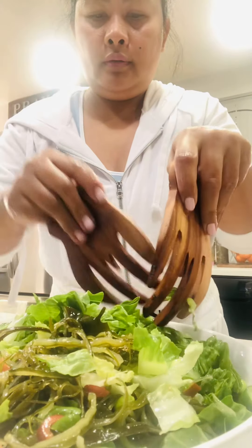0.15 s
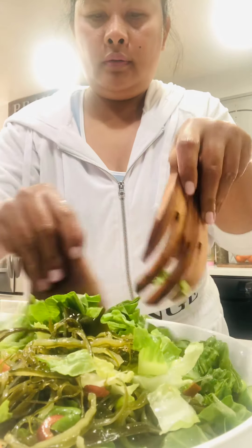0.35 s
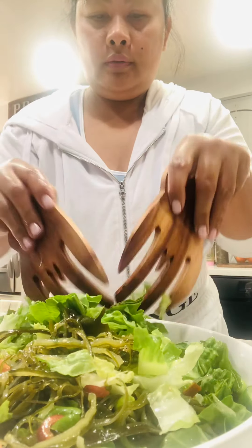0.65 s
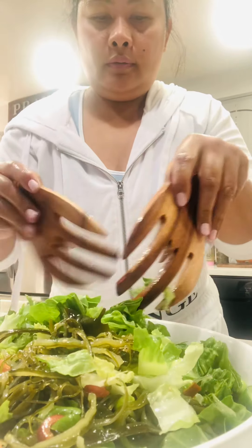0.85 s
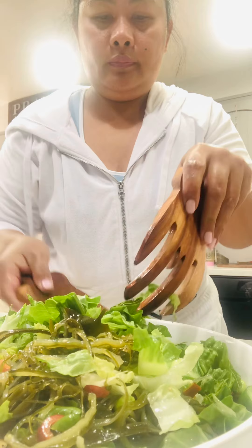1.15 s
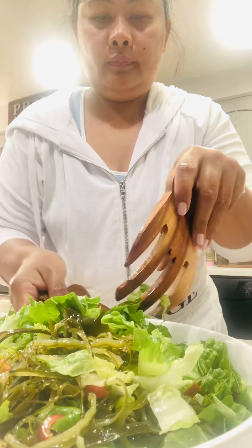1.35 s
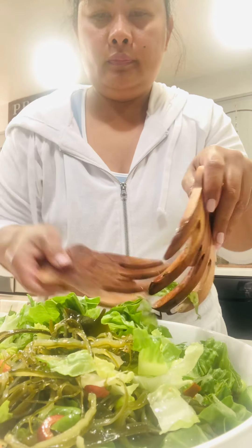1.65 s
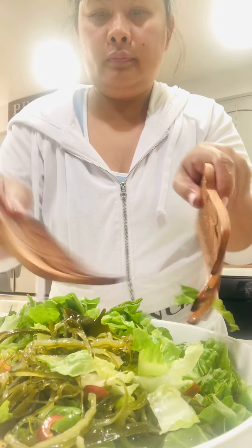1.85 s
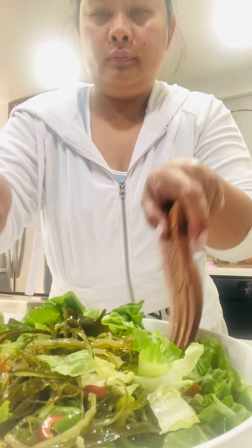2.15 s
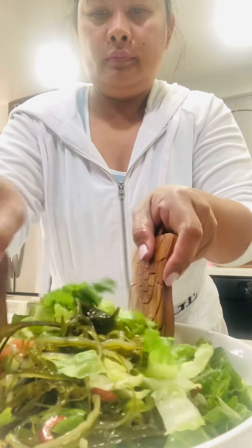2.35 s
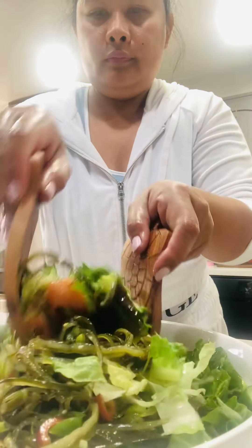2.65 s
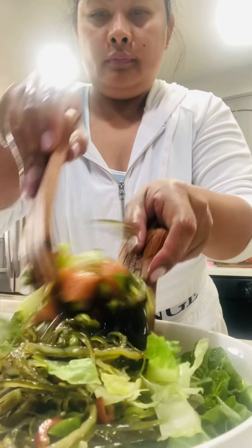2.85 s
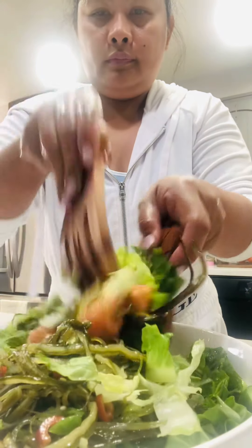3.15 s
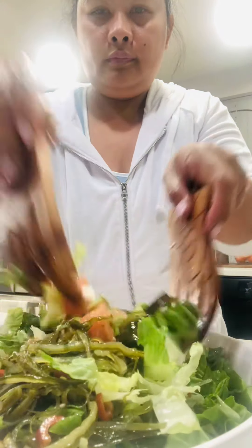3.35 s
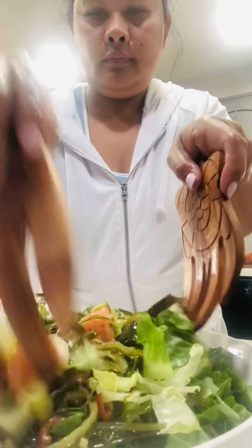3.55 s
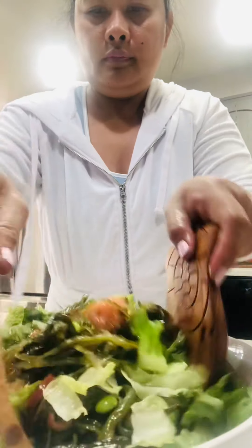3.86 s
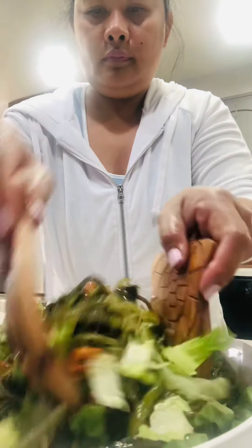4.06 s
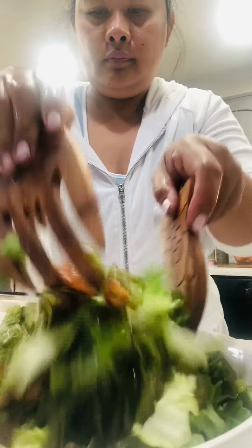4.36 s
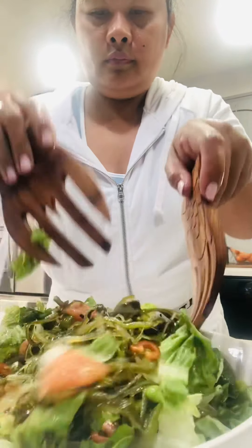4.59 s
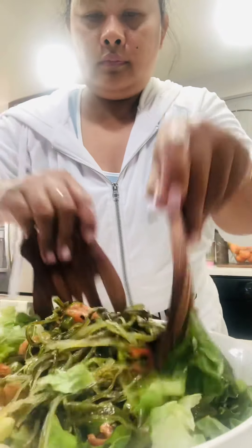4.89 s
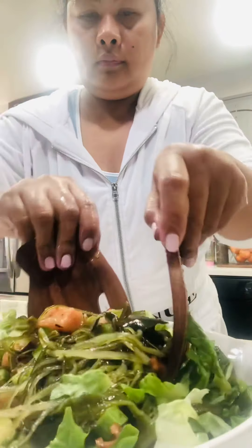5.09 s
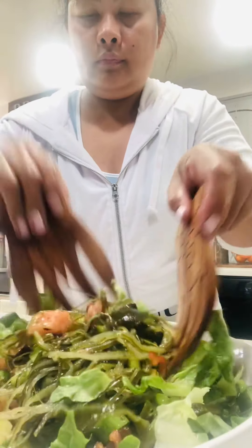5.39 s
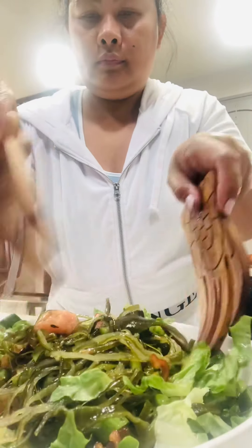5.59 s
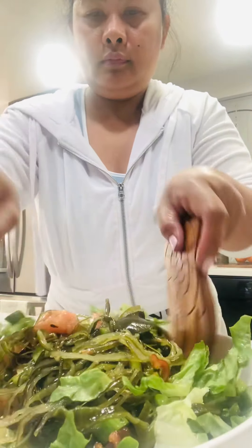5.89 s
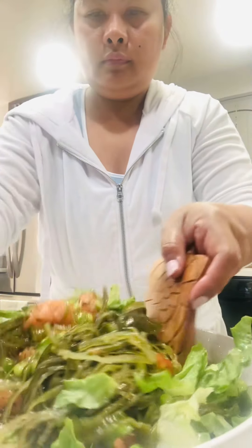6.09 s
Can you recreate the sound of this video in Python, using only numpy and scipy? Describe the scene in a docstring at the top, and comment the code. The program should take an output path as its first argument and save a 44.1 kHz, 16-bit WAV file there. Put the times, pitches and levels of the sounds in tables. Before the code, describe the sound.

Wet lettuce and seaweed are turned with wooden servers in a ceramic bowl, heard close and fairly dry with slight room echo. Gentle rustling is broken by a light tap, a bright dragging clank, and a quick double knock with a swishing heap. Crisp snaps peak midway, quiet pauses and softer leaf folds follow, and three woody, ringing knocks end the stirring. Low fridge hum and soft air stay beneath.

```python
"""Wooden salad servers toss wet leaves and seaweed in a big ceramic bowl in a quiet kitchen, a fridge humming.
A light knock at 0.2 s opens the stirring; a harder one at 1.3 s drags on and makes the bowl sing in its rim modes.
A double knock near 2.06 s starts a toss full of leaf snaps; the sharpest snaps come at 3.7 s, softer ones near 5 s.
Three knocks from 5.6 to 5.9 s close it. Blows are decaying modes, rubs and faint whistles are resonant noise,
leaves are ringing grains and hiss, snaps are short noise bursts, the room is feedback delays."""
import sys
import numpy as np
from scipy import signal
from scipy.fft import rfft, irfft, next_fast_len
from scipy.io import wavfile

SR = 44100
rng = np.random.default_rng(int(sys.argv[2]) if len(sys.argv) > 2 else 0)


def log_audio(samples):
    """Write samples as a 16-bit WAV file to the path given in sys.argv[1]."""
    # one column per channel
    frames = np.atleast_2d(samples).T
    # limit to full scale, then quantise
    limited = np.clip(frames, -1, 1)
    pcm = np.round(limited * 32767).astype(np.int16)
    wavfile.write(sys.argv[1], SR, pcm)


N = 274787

# rim modes of the bowl: mode_hz, t60_s
BOWL_MODES = [(405, 0.2), (983, 0.64), (1708, 0.32), (2541, 0.041), (3478, 0.085), (4500, .09),
              (5620, 0.057), (6830, 0.091), (8145, 0.072), (9520, 0.068), (10980, 0.03)]
# blows of the servers on the bowl: start_s, contact_s,
# damping by server and leaves: low_damping_db_per_s (three lowest modes), high_damping_db_per_s (the others),
# clack_db, clack_t60_s, crack_hz, crack_db, clatter_db, thud_db, jolt_db (of the heap),
# mode_db x 7 (lowest bowl modes, set by the place of the blow), higher_modes_db
KNOCKS = [(0.215, 0.0008, 79, 50, -38.5, 0.019, 4450, -18, -48, -41, -52.5, -41, -47, -34.5, -13.5, -30.5, -32, -48, -41.5),
          (1.3025, 0.00037, 430, 57, -19, 0.034, 6200, -24.5, -41.5, -50, -47, -28.5, -19, -24, -12.5, -17, -33.5, -28.5, -36),
          (2.0566, 0.0012, 250, 200, -40, 0.023, 3000, -52, -43, -47, -60, -59, -50, -32, -34, -50, -52, -59, -61),
          (2.063, 0.0002, 500, 89, -25.5, 0.032, 5500, -42, -30.5, -26.5, -40.5, -29, -33.5, -27.5, -17, -31.5, -35, -35, -41),
          (5.6095, 0.00081, 370, 20, -27, 0.02, 3000, -40.5, -51.5, -31.5, -44.5, -27.5, -28.5, -36.5, -27.5, -32, -38.5, -45, -54.5),
          (5.737, 0.00034, 29, 10, -32.5, 0.042, 6000, -34.5, -27, -31.5, -49, -27, -31, -18, -5, -25, -18, -27, -43.5),
          (5.8985, 0.00049, 3.9, 56, -26, 0.016, 1620, -26, -47, -41, -76, -62, -80, -68, -65, -65, -65, -58, -66)]
# stirring: time_s, rustle_db, shove_db (servers pushing through)
STIR = [(0, -84, -80.5), (0.2, -92, -68), (0.25, -62.5, -59), (0.32, -58, -63), (0.38, -73, -71),
        (0.55, -67.5, -71), (0.7, -88.5, -74.5), (1.0, -80, -70.5), (1.29, -75.5, -67.5),
        (1.34, -62, -45.5), (1.42, -68, -58), (1.58, -62, -82), (1.64, -79.5, -72), (1.85, -89, -88.5),
        (2.0, -69, -68.5), (2.1, -62, -55), (2.15, -50, -55.5), (2.25, -55, -54.5), (2.3, -61, -52),
        (2.42, -70, -63.5), (2.55, -67, -72.5), (2.7, -71.5, -75), (2.87, -66, -70), (2.92, -84, -81),
        (3.03, -69.5, -69), (3.07, -61.5, -65.5), (3.2, -62, -67), (3.3, -75, -77), (3.4, -69.5, -79.5),
        (3.52, -81, -70.5), (3.62, -58, -63), (3.82, -56, -59), (3.92, -59, -59), (3.98, -69, -72),
        (4.4, -70, -75), (4.47, -79.5, -79), (4.76, -77.5, -82), (4.82, -56, -60), (4.88, -62.5, -61),
        (5.04, -59, -60.5), (5.1, -68.5, -68), (5.2, -65, -68), (5.27, -67, -72), (5.32, -61.5, -64.5),
        (5.45, -77.5, -85.5), (5.6, -90, -71), (5.7, -66, -59), (5.78, -54, -60), (5.93, -57, -60),
        (6.08, -61, -53), (6.19, -72, -68), (6.23, -63.5, -77.5)]


def from_db(db):
    """Decibels to gain."""
    return 10 ** (np.asarray(db) / 20)


def rms_one(x):
    """Scale to rms 1."""
    return x / np.sqrt(np.mean(x ** 2) + 1e-20)


def peak_one(x):
    """Scale to peak 1."""
    return x / np.abs(x).max()


def add(out, start_s, sound):
    """Mix a sound in at start_s."""
    at = round(start_s * SR)
    out[at:at + len(sound)] += sound[:N - at]


def along(table, time_s):
    """Columns of a table, interpolated at time_s."""
    times_s, *columns = np.transpose(table)
    return [np.interp(time_s, times_s, c) for c in columns]


def drift(rate_hz):
    """Slow random wander of spread 1: noise through two equal poles, run at SR / 40."""
    r = np.exp(-80 * np.pi * rate_hz / SR)
    noise = rng.standard_normal(N // 40 + 2002)
    slow = signal.lfilter([1], [1, -2 * r, r * r], noise)[2000:]   # settled part
    return np.interp(np.arange(N) / 40, np.arange(len(slow)), rms_one(slow))


def burst(t, t60_s):
    """Noise that dies exponentially."""
    return rng.standard_normal(len(t)) * from_db(-60 * t / t60_s)


def ring(x, hz, t60_s):
    """Two-pole resonator: a unit click sets a decaying sine of height 1 ringing."""
    r = from_db(-60 / (t60_s * SR))
    w = 2 * np.pi * hz / SR
    return signal.lfilter([0, np.sin(w)], [1, -2 * r * np.cos(w), r * r], x + 1e-18)


def struck(hz, db, t60_s, t, contact_s):
    """A mode that swells while the contact lasts, the low ones later, then dies."""
    swell = (1 - np.exp(-t / (contact_s + 0.61 / hz))) ** 2
    return from_db(db - 60 * t / t60_s) * swell * np.sin(2 * np.pi * hz * t)


def colour(x, spectrum):
    """Filter x by a spectrum interpolated on a log-frequency axis; rms 1."""
    size = next_fast_len(N)
    hz = np.maximum(np.arange(size // 2 + 1) * SR / size, 1)
    points = np.array(spectrum)
    gain_db = np.interp(np.log(hz), np.log(points[:, 0]), points[:, 1])
    return rms_one(irfft(rfft(x, size) * from_db(gain_db), size)[:N])


def fridge():
    """Mains hum and motor tones whose level and phase waver."""
    # tone_hz, rms_db (before wavering), waver_db
    hum_tones = [(59.8, -69, 0), (116.4, -78.5, 4.5), (282, -78, 2.5), (363, -74.5, -0.5)]
    t = np.arange(N) / SR
    out = np.zeros(N)
    for hz, db, waver_db in hum_tones:
        level = np.sqrt(2) * from_db(db + waver_db * drift(3.5))
        out += level * np.sin(2 * np.pi * hz * t + waver_db * 0.18 * drift(3.7))
    return out


def kitchen_air():
    """Steady background noise, coloured by its spectrum."""
    # point_hz, relative_db
    air_spectrum = [(25, -33.5), (45, -13), (70, -10.5), (150, 0), (220, -5), (290, 1), (400, -7),
                    (900, -13), (1700, -18.5), (2400, -20.5), (6200, -22.5), (8500, -28), (12000, -32),
                    (15600, -32.5), (16100, -68)]
    air_rms_db = -65.5
    return from_db(air_rms_db) * colour(rng.standard_normal(N), air_spectrum)


def grains(per_s, spread_db, clump_db):
    """Tiny clicks of uneven size that come in clumps."""
    sizes = from_db(spread_db * np.minimum(rng.exponential(1, N), 4)) * rng.standard_normal(N)
    odds = per_s * from_db(clump_db * drift(25)) / SR
    return sizes * (rng.random(N) < odds)


def leaves(spectrum, per_s, low_hz, high_hz, cycles, smooth):
    """Wet grains ring folds of 12 sizes, over the smooth hiss of leaf sliding on leaf; smooth = hiss share."""
    clicks = grains(per_s, spread_db=2.5, clump_db=4.0)
    dealt = rng.integers(0, 12, N)
    rung = np.zeros(N)
    for k, hz in enumerate(np.geomspace(low_hz, high_hz, 12)):
        rung += ring(clicks * (dealt == k), hz, cycles / hz) * np.sqrt(hz)
    hiss = rng.standard_normal(N) * from_db(5.2 * drift(6.7))
    return colour(np.sqrt(1 - smooth) * rms_one(rung) + np.sqrt(smooth) * hiss, spectrum)


def shove():
    """Servers push through the heap: mostly smooth, low leaf noise; rms 1."""
    # point_hz, relative_db
    shove_spectrum = [(350, -33.5), (600, -19.5), (777, -17), (984, -1), (2910, -7.5), (3500, -4.5),
                      (4550, -24.5), (7700, -120)]
    return leaves(shove_spectrum, 700, 773, 3000, cycles=22.0, smooth=0.88)


def rustle():
    """Leaves rub and fold: grainier, brighter leaf noise; rms 1."""
    # point_hz, relative_db
    rustle_spectrum = [(1180, -33.5), (2000, -6.5), (2810, -4.5), (4260, -3.5), (4890, -2), (7310, -7.5),
                       (9000, -18), (11700, -39), (19800, -120)]
    return leaves(rustle_spectrum, 720, 2200, 8000, cycles=11.0, smooth=0.4)


def fizz():
    """Wet fizz: dense treble grains; rms 1."""
    # point_hz, relative_db
    fizz_spectrum = [(4000, -39.5), (7000, 0.5), (10000, -3), (13000, -0.5), (15500, 1), (16100, -23.5)]
    return leaves(fizz_spectrum, 1200, 5300, 15000, cycles=18.0, smooth=0.35)


def through_bowl(x):
    """Whatever moves in the bowl feeds its rim modes, here heavily damped."""
    return sum(ring(x, hz, 0.02) for hz, _ in BOWL_MODES)


def flop(low_hz, high_hz):
    """The heap shifts and lands: lumpy low noise; rms 1."""
    band = signal.butter(3, [low_hz, high_hz], "band", fs=SR, output="sos")
    lows = signal.sosfilt(band, rng.standard_normal(N))
    return rms_one(lows * from_db(1.7 * drift(5.3)))


def tossed_salad():
    """Stirring sets the shove and rustle; what each toss moves sets the fizz and the flop of the heap."""
    # time_s, fizz_over_rustle_db, flop_db
    load = [(0.1, -7, -73.5), (0.4, -17, -78), (0.85, -20, -73.5), (1.5, -11.5, -69.5), (1.9, 0.5, -79.5),
            (2.35, -13.5, -70.5), (2.8, -3.5, -70.5), (3.15, -8.5, -72.5), (3.6, -3, -69.5), (3.7, -7, -59),
            (3.85, -6.5, -65.5), (4.2, 0, -76.5), (4.65, -4.5, -75), (5.0, -10, -64.5), (5.5, -6, -79),
            (5.9, -7.5, -59.5), (6.2, -7, -71.5)]
    t = np.arange(N) / SR
    rustle_gain, shove_gain = from_db(along(STIR, t))
    fizz_gain, flop_gain = from_db(along(load, t))
    salad = shove_gain * shove()
    salad += rustle_gain * rustle()
    salad += rustle_gain * fizz_gain * fizz()
    salad += from_db(-48.5) * through_bowl(salad)
    return salad + flop_gain * flop(85, 600)


def bowl_rings(t, contact_s, low_damping, high_damping, mode_db):
    """Rim modes damped by server and leaves, each with a faint undamped twin close in pitch that rings on."""
    twin_db, low_twin_db, twin_t60_s = -30.5, -36, 0.33   # twin levels are relative to the mode
    out = np.zeros(len(t))
    for k, (hz, t60_s) in enumerate(BOWL_MODES):
        db = mode_db[min(k, 7)] - 6.3 * max(k - 7, 0)   # the soft wood drives the top modes ever less
        held = from_db(-(low_damping if k < 3 else high_damping) * t)
        out += held * struck(hz, db, t60_s, t, contact_s)
        faint_db = db + (low_twin_db if k < 3 else twin_db)
        out += struck(hz * 1.006, faint_db, twin_t60_s, t, contact_s)
    return out


def server_clack(t, contact_s, clack_db, clack_t60_s):
    """Modes of the wooden server, shifted a little by the grip."""
    # mode_hz, relative_db
    server_modes = [(505, -8.5), (650, -1.5), (1180, -7), (1450, -2.5), (2020, -2.5), (2410, 1), (3150, 0),
                    (3590, 3), (4150, -6.5), (4800, -16.5), (5770, -11), (6200, -27), (7300, -19.5)]
    out = np.zeros(len(t))
    for hz, db in server_modes:
        pitch_shift, level_shift = rng.standard_normal(2)
        shifted_hz = hz * (1 + 0.045 * pitch_shift)
        out += struck(shifted_hz, clack_db + db + 1.8 * level_shift, clack_t60_s, t, contact_s)
    return out


def knocks():
    """Each blow rings the bowl, clacks the server, cracks, clatters and thuds the bowl on the counter."""
    thud_hz = 288
    out, t = np.zeros(N), np.arange(SR // 2) / SR
    dense = signal.butter(1, [450, 3500], "band", fs=SR, output="sos")   # wood modes too many to tell apart
    for (start_s, contact_s, low_damping, high_damping, clack_db, clack_t60_s, crack_hz, crack_db,
         clatter_db, thud_db, _, *mode_db) in KNOCKS:
        sound = struck(thud_hz, thud_db, 0.082, t, contact_s)
        sound += struck(thud_hz * 1.9, thud_db - 6, 0.078, t, contact_s)
        crack_t60_s = 4.9 / crack_hz
        crack = ring(ring(burst(t, 0.011), crack_hz, crack_t60_s), crack_hz, crack_t60_s)
        sound += from_db(crack_db) * peak_one(crack)
        clatter = signal.sosfilt(dense, burst(t, 0.11)) * (1 - np.exp(-t / .003))
        sound += from_db(clatter_db) * peak_one(clatter)
        sound += bowl_rings(t, contact_s, low_damping, high_damping, mode_db)
        sound += server_clack(t, contact_s, clack_db, clack_t60_s)
        add(out, start_s, sound)
    return out


def jolts():
    """After each knock the heap's low noise swells, then settles."""
    rise_s, t60_s = 0.01, 0.49
    gain, t = np.zeros(N), np.arange(SR // 2) / SR
    for start_s, jolt_db in np.array(KNOCKS)[:, [0, 10]]:
        add(gain, start_s, from_db(jolt_db - 60 * t / t60_s) * (1 - np.exp(-t / rise_s)))
    return gain * flop(223, 527)


def lump_thuds():
    """Lumps of salad land and rock the bowl: one low decaying mode each."""
    # start_s, level_db, pitch_hz
    lumps = [(0.216, -47, 160), (2.081, -39, 131), (2.168, -35.5, 166.6), (3.672, -41.5, 303),
             (3.716, -45, 139), (5.759, -34, 129.7), (5.904, -36.5, 191)]
    out, t = np.zeros(N), np.arange(SR // 2) / SR
    for start_s, db, hz in lumps:
        add(out, start_s, struck(hz, db, 0.093, t, contact_s=0.0016))
    return out


def rubs_and_whistles():
    """Noise through one resonance, swelling and fading: rubs, faint narrow whistles and the singing rim."""
    # server edge rubs, and faint narrow whistles (the rows at 0.724, 0.989, 1.04 and 1.763 s):
    # start_s, length_s, pitch_hz, width_hz, level_db
    single_tones = [(0.231, 0.095, 4400, 700, -63), (0.724, .2, 5900, 150, -80.5),
                    (0.989, 0.2, 3710, 148, -79), (1.04, 0.12, 6420, 200, -77.5),
                    (1.461, 0.09, 1080, 250, -60), (1.527, 0.076, 1095, 400, -53),
                    (1.549, 0.047, 3720, 900, -61), (1.763, 0.39, 6470, 200, -76),
                    (2.253, 0.021, 1100, 250, -63), (2.32, 0.098, 1480, 814, -56.5),
                    (3.64, 0.029, 1030, 300, -55), (5.854, 0.036, 6170, 1500, -50.5),
                    (5.918, 0.04, 1560, 500, -49.5), (6.088, 0.044, 1580, 445, -55.5)]
    # server dragging on the bowl, one rim mode singing: start_s, length_s, bowl_mode_row (rounded down), level_db
    bowl_drags = [(1.33, 0.25, 4, -67.5), (1.36, 0.11, 2.9, -70), (1.368, 0.25, 5.6, -71),
                  (1.414, 0.019, 3.4, -54), (1.44, 0.25, 3.4, -72), (1.499, 0.15, 2, -63.5),
                  (1.536, 0.065, 6, -57.5), (1.55, 0.044, 9.8, -73)]
    sing_width_hz = 70
    tones = list(single_tones)
    for start_s, length_s, row, db in bowl_drags:
        tones.append((start_s, length_s, BOWL_MODES[int(row)][0], sing_width_hz, db))
    out = np.zeros(N)
    for start_s, length_s, hz, width_hz, db in tones:
        noise = rng.standard_normal(SR // 2)
        t60_s = 3.9 / width_hz
        tone = ring(ring(noise, hz, t60_s), hz, t60_s)[SR // 10:]   # settled part
        swell = signal.windows.tukey(round(length_s * SR), .6)
        add(out, start_s, from_db(db) * swell * rms_one(tone[:len(swell)]))
    return out


def small_snaps():
    """Lesser snaps fall at random, more often and louder where the leaves rustle."""
    count, max_over_rustle_db, mean_tick_over_snap_db = 60, 11.5, -13.5
    t = np.arange(0, N / SR - .05, .001)
    rustle_db = along(STIR, t)[0]
    odds = np.cumsum(from_db(1.2 * rustle_db))
    when, size, loud, wet = rng.random((count, 4)).T
    start_s = np.interp(when, odds / odds[-1], t)
    db = along(STIR, start_s)[0] + max_over_rustle_db - 8 * loud
    centre_hz = 2000 * 3.0 ** size
    tick_db = db + mean_tick_over_snap_db + 16 * (wet - .5)
    return list(zip(start_s, db, centre_hz, tick_db))


def snaps():
    """A leaf rib breaks: noise ringing briefly at the size of the fold, and a bright wet tick."""
    # the loudest: start_s, peak_db, centre_hz, tick_peak_db
    loud_snaps = [(0.4499, -55, 2280, -53), (1.5614, -47, 3600, -68), (1.974, -49, 2820, -64.5),
                  (2.032, -52, 2530, -54), (2.102, -39, 2720, -37), (2.1454, -47, 2560, -43),
                  (2.168, -30.5, 3770, -56), (2.231, -40, 3600, -59), (2.2454, -32, 2420, -66),
                  (2.3105, -40, 4070, -66), (2.3256, -37, 2520, -68), (2.382, -42, 2320, -46.5),
                  (2.3998, -41.5, 3400, -63), (2.444, -46, 4100, -52), (2.513, -42, 4940, -63),
                  (2.706, -44.5, 5600, -69), (2.871, -47, 2270, -72), (3.669, -35, 3280, -38),
                  (3.6825, -21, 5430, -22), (3.686, -29, 3400, -50), (3.719, -37, 3300, -52),
                  (3.749, -32.5, 4960, -59), (3.764, -38, 4650, -55), (3.7825, -31.5, 4490, -40),
                  (3.7915, -27, 6440, -54), (3.882, -35.5, 5630, -66), (3.907, -36, 4330, -55),
                  (3.934, -31.5, 5150, -54), (4.0653, -48, 7270, -63), (4.2238, -45, 6400, -58),
                  (4.549, -47.5, 5900, -74), (4.825, -40, 2240, -63), (4.8567, -47, 4040, -58),
                  (4.8954, -46, 2900, -66), (4.9572, -33, 2330, -63), (4.999, -42, 3060, -64),
                  (5.0728, -38.5, 3280, -53), (5.1348, -47.5, 4370, -55), (5.1916, -41.5, 4050, -68),
                  (5.2218, -39, 3320, -54), (5.2364, -46, 3470, -65), (5.252, -56, 3990, -70),
                  (5.8596, -45, 5570, -52), (5.944, -46, 2500, -62), (5.9903, -49, 4870, -44),
                  (6.0228, -34.5, 2500, -69), (6.1505, -42.5, 3430, -52)]
    snap_t60_s, base_tick_hz = 0.0092, 7700
    knee_db, db_per_octave = -52, 28   # ticks harder than the knee are sharper
    out, t = np.zeros(N), np.arange(SR // 20) / SR
    for start_s, db, hz, tick_db in list(loud_snaps) + small_snaps():
        fold = signal.butter(2, [hz / 1.62, min(hz * 1.36, 12000)], "band", fs=SR, output="sos")
        breaking = burst(t, snap_t60_s)
        breaking[0] = 4.8   # the break itself is one sharp step
        body = signal.sosfilt(fold, breaking)
        octaves_up = max(tick_db - knee_db, 0) / db_per_octave
        tick_hz = min(base_tick_hz * 2 ** octaves_up, 15500)
        tick_noise = np.diff(burst(t, snap_t60_s * 1.8), prepend=0)
        tick = ring(tick_noise, tick_hz, 11.0 / tick_hz)
        add(out, start_s, from_db(db) * peak_one(body) + from_db(tick_db) * peak_one(tick))
    return out


def kitchen(x):
    """Room echo: eight feedback delays, duller on every round, summed with alternate signs."""
    t60_s, wall_cut_hz = 0.36, 2700
    out, dull = np.zeros(N), np.exp(-2 * np.pi * wall_cut_hz / SR)
    lags = (rng.uniform(.008, .03, 8) * SR).astype(int)
    for k, lag in enumerate(lags):
        loop, state = x.copy(), [0.]
        gain = from_db(-60 * lag / SR / t60_s)
        for i in range(lag, N, lag):   # one round at a time
            back, state = signal.lfilter([gain * (1 - dull)], [1, -dull], loop[i - lag:i], zi=state)
            loop[i:i + lag] += back[:N - i]
        out += (loop - x) * (-1) ** k
    return out


def scene():
    """Bowl and salad close by, the kitchen behind."""
    close = tossed_salad() + knocks() + jolts() + lump_thuds() + rubs_and_whistles() + snaps()
    # small things radiate no deep bass
    close = signal.sosfilt(signal.butter(2, 70, "high", fs=SR, output="sos"), close)
    echo = from_db(-23.5) * kitchen(close)
    return (close + echo + kitchen_air() + fridge())[None]


def record(dry):
    """Steep low-pass: 70 dB down from 16.9 kHz up."""
    return signal.sosfilt(signal.cheby2(12, 70, 16900, fs=SR, output="sos"), dry)


dry = scene()
out = record(dry)
log_audio(out)
```